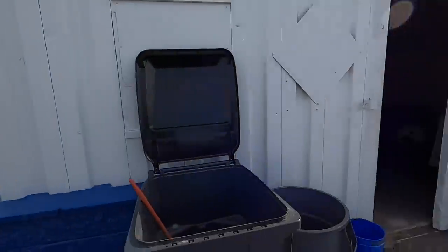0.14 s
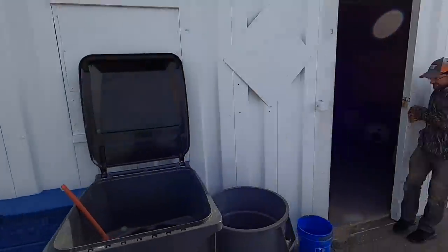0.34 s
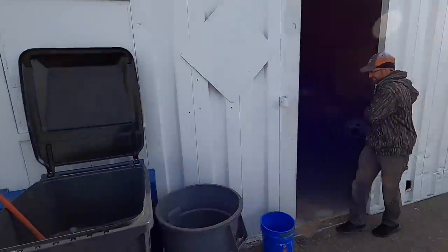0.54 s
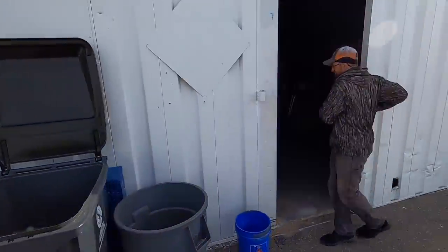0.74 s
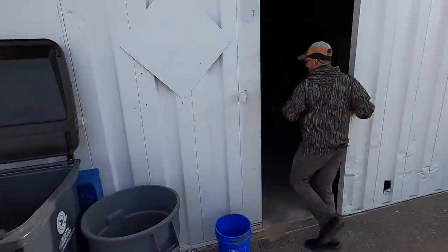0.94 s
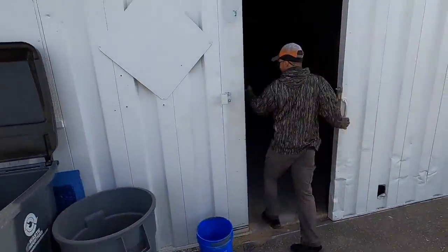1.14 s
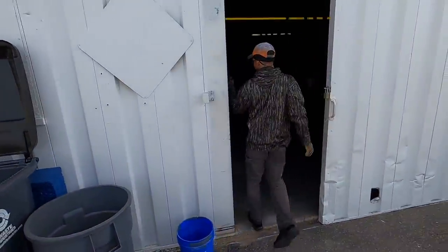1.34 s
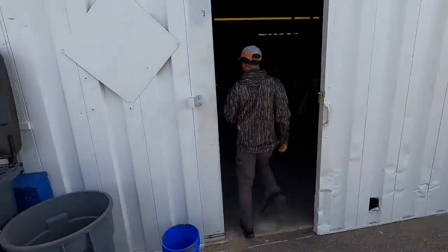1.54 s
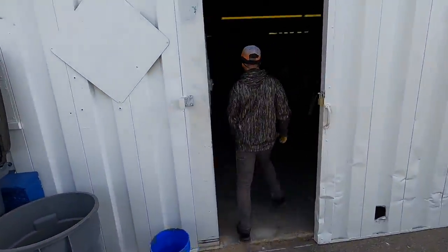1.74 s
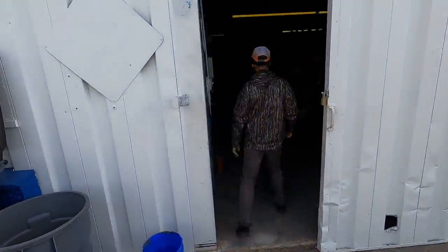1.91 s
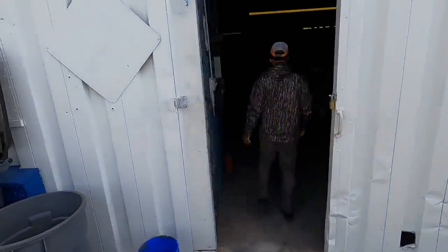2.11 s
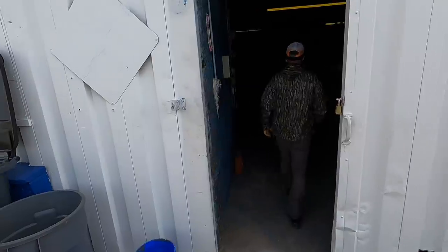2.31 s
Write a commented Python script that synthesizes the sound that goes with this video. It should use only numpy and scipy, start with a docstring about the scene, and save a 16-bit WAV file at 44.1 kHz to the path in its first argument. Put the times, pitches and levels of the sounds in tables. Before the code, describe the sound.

A big sheet-metal sliding door rumbles, booms and rattles at once, scraping in its track, then slows with small ticks and a hollow knock; soft gritty steps follow, heard close by outside a shed.

```python
"""A sheet-metal sliding door rumbles and booms along its track and coasts to rest; shoes then scuff grit.
Rumble, boom and track scrape are coloured noise riding level curves; jolts, stop knocks, ticks and scuffs
are bursts of tiny impacts with a favoured pitch. Squeaks, groans, the ringing door edge and low thuds
are sines. A faint noise wash of air comes up late, as the steps enter the shed."""
import sys
import numpy as np
from scipy import signal
from scipy.fft import rfft, irfft, next_fast_len
from scipy.io import wavfile
from scipy.ndimage import uniform_filter1d, map_coordinates

SR = 44100
rng = np.random.default_rng(int(sys.argv[2]) if len(sys.argv) > 2 else 0)


def output_pcm(signal):
    """Save a mono or channel-first signal as 16-bit PCM at the path in sys.argv[1].

    Samples are clipped to [-1, 1] before scaling.
    """
    pcm = np.clip(np.atleast_2d(signal).T, -1, 1) * 32767
    wavfile.write(sys.argv[1], SR, np.round(pcm).astype(np.int16))


def boost(x):
    """Linear amplitude factor 10**(x/20) for a level x in decibels (scalar or array-like)."""
    u = np.asarray(x, float) / 20
    return 10 ** u


N = 108618  # length in samples

# Scrape in the track. Each row: time in seconds, level in dB.
DRAG_LEVEL = [(0, -34.5), (.5, -33), (.76, -35.5), (.95, -44), (1.08, -42.5), (1.25, -46), (1.75, -58.5)]
# The door knocks on its stop and settles. Each row: time in seconds, level in dB, ring in Hz, t60 in seconds.
STOP_KNOCKS = [(1.186, -30.5, 950, 0.32), (1.287, -39, 694, 0.17)]
# Colour of grit and loose fittings. Each row: frequency in Hz, relative level in dB.
GRIT_COLOUR = [(290, -50), (500, -4), (1410, -5), (3790, -11.5), (8980, -26.5), (15500, -53)]


def unit(x):
    """Scale to rms 1."""
    return x / np.sqrt(np.mean(x ** 2) + 1e-20)


def along(points, hz):
    """Read (Hz, value) points on a log frequency axis."""
    f, v = np.transpose(points)
    return np.interp(np.log(hz + 1), np.log(f + 1), v)


def curve(rows):
    """Join (seconds, value) points by lines, one value per sample."""
    return np.interp(np.arange(N) / SR, *np.transpose(rows))


def wobble(rate):
    """A smooth random curve with rate knots a second."""
    knots = rng.standard_normal(int(N * rate / SR) + 4)
    return map_coordinates(knots, [np.arange(N) * rate / SR])


def filtered(x, gain_db):
    """Colour x by a dB function of frequency."""
    m = next_fast_len(len(x) + 4096)
    gain = boost(gain_db(np.fft.rfftfreq(m, 1 / SR)))
    return irfft(rfft(x, m) * gain, m)[:len(x)]


def grains(size, spread_db):
    """Dense tiny impacts: noise whose strength changes at random every 16 samples."""
    strength_db = spread_db * np.repeat(rng.standard_normal(size // 16 + 1), 16)[:size]
    return unit(rng.standard_normal(size) * boost(strength_db))


def place(out, seconds, sound):
    """Mix a sound into out from a given time."""
    out[round(seconds * SR):][:len(sound)] += sound


def bursts(rows, spectrum, rise_s, spread_db, ring_db, snap=0):
    """Each row is a swell of impacts with one favoured pitch; snap adds one strong, blunt first impact."""
    ring_sharpness = 4
    snap_reach = 1.9  # sets how far up the first impact carries, as a multiple of the favoured pitch
    treble_hz, treble_db = 6000, 2.5  # without a snap, the treble starts brighter and dies twice as fast
    out, size, lead = np.zeros(N + SR), SR // 3, SR // 20
    t = (np.arange(size) - lead) / SR  # zero where the rise ends and the decay begins
    for s, db, hz, t60 in rows:
        rise = np.exp(-.5 * (t / rise_s) ** 2)
        shape = np.where(t < 0, rise, boost(-60 * t / max(t60, .01)))

        def colour(f):
            ring = ring_db / (1 + (ring_sharpness * np.log((f + 1) / hz)) ** 2)
            return along(spectrum, f) + ring

        blow = np.exp(-(np.pi * snap_reach * hz * t) ** 2)
        impacts = grains(size, spread_db) + snap * blow / blow.sum()
        swell = unit(filtered(impacts, colour))
        if not snap:
            treble = filtered(swell, lambda f: -10 * np.log10(1 + (treble_hz / (f + 1)) ** 4))
            swell = swell - treble + treble * shape * boost(treble_db)
        place(out, s, boost(db) * shape * swell)
    return out[lead:lead + N]


def modes_db(hz):
    """The sheet resonates: each mode lifts a band around its pitch."""
    # Each row: frequency in Hz, width in Hz, lift in dB.
    panel_modes = [(236.5, 4.1, 7), (349.5, 90, 3), (1000, 165, 5), (1234, 17, 2.5)]
    return sum(lift / (1 + (2 * (hz - c) / w) ** 2) for c, w, lift in panel_modes)


def rolling_rumble():
    """The rolling panel rumbles with its modes; its upper part dulls as the track drag falls."""
    # Each row: time in seconds, level in dB before dulling and wobble.
    roll_level = [(0, -25.5), (.15, -18.5), (.33, -19), (.44, -16), (.6, -21), (.8, -23), (.92, -25),
                  (1.0, -30), (1.46, -34.5), (1.82, -44), (2.46, -43.5)]
    # Each row: frequency in Hz, relative level in dB.
    panel_colour = [(59, -6), (100, -3.5), (145, -0.5), (250, -0.5), (350, -6.5), (600, -18.5),
                    (910, -20.5), (1540, -120)]
    dulling_hz, dulling_db = 306, 0.52  # above this pitch, dB lost for each dB the drag falls
    body = unit(filtered(grains(N, spread_db=1.5), lambda f: along(panel_colour, f) + modes_db(f)))
    low = filtered(body, lambda f: -10 * np.log10(1 + (f / dulling_hz) ** 8))
    drag_db = curve(DRAG_LEVEL)
    body = low + (body - low) * boost(dulling_db * (drag_db - drag_db.max()))
    return body * boost(curve(roll_level) + 1.7 * wobble(24.77))


def flexing_boom():
    """The flexing sheet booms: low noise swelling and falling."""
    # Each row: time in seconds, level in dB.
    flex_level = [(.05, -26), (.16, -15.5), (.25, -24.5), (.31, -18), (.4, -32.5), (.48, -15), (.54, -42),
                  (.59, -25), (.99, -29), (1.12, -22), (1.18, -27), (1.44, -27), (1.52, -32.5), (1.93, -37),
                  (2.15, -37.5), (2.33, -37), (2.39, -35.5)]
    # Each row: frequency in Hz, relative level in dB.
    boom_colour = [(11, -50), (22, -9), (50, 5), (72, -2), (150, -7.5), (330, -120)]
    boom = unit(filtered(rng.standard_normal(N), lambda f: along(boom_colour, f)))
    return boom * boost(curve(flex_level))


def track_drag():
    """Grit scrapes in the track: uneven grains heard through the panel's modes."""
    # Each row: frequency in Hz, relative level in dB.
    track_colour = [(260, -38), (450, 1), (700, 0), (1300, -2.5), (3910, -16), (8570, -33), (15500, -61)]
    scrape = unit(filtered(grains(N, spread_db=3.5), lambda f: along(track_colour, f) + modes_db(f)))
    return scrape * boost(curve(DRAG_LEVEL) + 0.66 * wobble(29.25))


def roller_jolts():
    """The rollers jolt over bumps and rattle the sheet."""
    # Each row: time in seconds, level in dB, strongest ring in Hz, t60 in seconds.
    jolt_rows = [(.022, -31, 1330, 0.27), (.088, -35, 3800, 0.14), (.178, -30, 4230, 0.4),
                 (.26, -24, 4360, 0.32), (.372, -27.5, 1250, 0.29), (.42, -29.5, 1000, 0.91),
                 (.472, -28, 1000, 0.14), (.575, -32, 1250, 0.82), (.63, -36.5, 4080, 0.26),
                 (.665, -31.5, 1700, 0.15), (.74, -39.5, 3130, 0.34), (.805, -37, 6300, 0.14),
                 (.868, -51, 5030, 0.24), (1.355, -44, 3200, 0.66)]
    # Each row: frequency in Hz, relative level in dB.
    rattle_colour = [(290, -58), (500, -33), (657, -1), (1130, 5), (3530, -8), (4600, -13.5),
                     (11100, -31.5), (15500, -59)]
    return bursts(jolt_rows, rattle_colour, rise_s=0.013, spread_db=1.0, ring_db=4.5)


def stop_knocks():
    """The door knocks on its stop: hollow bursts with a strong favoured pitch."""
    # Each row: frequency in Hz, relative level in dB.
    hollow_colour = [(250, -33), (500, 3), (1000, 1.5), (2000, 1), (9000, -44)]
    return bursts(STOP_KNOCKS, hollow_colour, rise_s=0.0027, spread_db=7.5, ring_db=15.0)


def loose_ticks():
    """Loose fittings tick sharply as the door slows."""
    # Each row: time in seconds, level in dB, strongest ring in Hz, t60 in seconds.
    tick_rows = [(.988, -43, 2500, 0.22), (1.024, -40, 2220, 0.3), (1.065, -43.5, 4900, 0.11),
                 (1.084, -40, 3970, 0.087), (1.107, -39, 3450, .12), (1.152, -45, 6000, 0.11)]
    return bursts(tick_rows, GRIT_COLOUR, rise_s=0.0018, spread_db=3.5, ring_db=4.5, snap=7)


def bending(x, depth_db):
    """The sheet bends as it moves: narrow resonances come up and fade."""
    z = signal.stft(x, nperseg=1024)[2]
    field = uniform_filter1d(rng.standard_normal(z.shape), size=2, axis=0)  # across pitch
    field = uniform_filter1d(field, size=6, axis=1)  # across time
    power_offset_db = depth_db ** 2 * np.log(10) / 20  # keeps the mean power
    z = z * boost(depth_db * unit(field) - power_offset_db)
    return signal.istft(z, nperseg=1024)[1][:N]


def door():
    """Rumble, drag, jolts and knocks pass through the bending sheet; boom and ticks join unbent."""
    sheet = rolling_rumble() + track_drag() + roller_jolts() + stop_knocks()
    return flexing_boom() + loose_ticks() + bending(sheet, depth_db=1.5)


def roller_squeaks():
    """The rollers squeak: very short sine tones that swell and fade."""
    # Each row: middle in seconds, peak level in dB, pitch in Hz.
    squeak_rows = [(0.027, -26.5, 1315), (0.181, -33, 4030), (0.264, -38, 4800), (0.54, -42.5, 5620)]
    width_s = 0.0045
    out, u = np.zeros(N + SR), np.arange(SR // 2) / SR - 2 * width_s
    for s, db, hz in squeak_rows:
        tone = np.sin(2 * np.pi * hz * (u + 2 * width_s))
        place(out, s - 2 * width_s, boost(db) * np.exp(-(u / width_s) ** 2) * tone)
    return out[:N]


def edge_groans():
    """The settling edge groans: rough tones gliding upward."""
    # Each row: middle in seconds, peak level in dB, pitch at the middle in Hz, rise in Hz per second.
    groan_rows = [(1.33, -40.5, 985, 2450), (1.424, -44.5, 954, 5300)]
    width_s = 0.034
    out, u = np.zeros(N + SR), np.arange(SR // 2) / SR - 2 * width_s
    for s, db, hz, rise in groan_rows:
        roughness = np.cumsum(rng.normal(0, 0.079, len(u)))  # random drift of phase
        phase = 2 * np.pi * (hz + rise * u / 2) * u + roughness
        place(out, s - 2 * width_s, boost(db) * np.exp(-(u / width_s) ** 2) * np.sin(phase))
    return out[:N]


def edge_ring():
    """Every stop knock rings the door edge: decaying modes with slightly rough pitch."""
    # Each row: pitch in Hz, relative level in dB, t60 in seconds.
    edge_modes = [(820, -2.5, 0.39), (950, 1.5, 0.16), (1518, -2, 0.11)]
    out, t = np.zeros(N + SR), np.arange(SR // 2) / SR
    onset = 1 - np.exp(-t / 0.004)
    for s, db, _, _ in STOP_KNOCKS:
        for hz, level, t60 in edge_modes:
            phase = 2 * np.pi * hz * t + np.cumsum(rng.normal(0, 0.039, len(t)))
            decay = boost(db - 0.5 + level - 60 * t / t60)
            place(out, s, decay * onset * np.sin(phase))
    return out[:N]


def shoe_scuffs():
    """Grit clicks and crunches under the soles: a blunt first impact, then fine grains."""
    # Each row: time in seconds, level in dB, strongest pitch in Hz, t60 in seconds.
    scuff_rows = [(1.289, -42.5, 5360, 0.08), (1.538, -45, 3080, 0.037), (1.546, -50, 3180, 0.12),
                  (1.609, -51, 2640, 0.17), (1.641, -51.5, 2500, 0.19), (1.684, -48, 1910, 0.083),
                  (1.695, -45.5, 1190, 0.057), (1.935, -46, 2220, 0.3), (1.948, -48.5, 3520, 0.28),
                  (1.966, -43, 2280, 0.21), (1.982, -45.5, 1200, 0.23), (2.038, -49, 3100, 0.15),
                  (2.082, -45, 4240, 0.0073), (2.087, -42, 3830, 0.019), (2.1, -46.5, 2720, 0.29),
                  (2.202, -52.5, 2000, 0.28), (2.237, -48, 2720, 0.011), (2.302, -50.5, 1530, 0.087),
                  (2.418, -56, 11150, 0.16), (2.436, -45, 1320, 0.17)]
    return bursts(scuff_rows, GRIT_COLOUR, rise_s=0.0018, spread_db=0.5, ring_db=11.5, snap=14)


def low_thuds():
    """Low thuds, sines that die at once: the first from the door, the later ones from heels."""
    # Each row: start in seconds, starting level in dB, pitch in Hz.
    thud_rows = [(1.285, -19.5, 278), (1.937, -25.5, 236), (1.956, -22.5, 277), (1.971, -27, 243)]
    t60_s = 0.039
    out, t = np.zeros(N + SR), np.arange(SR // 8) / SR
    for s, db, hz in thud_rows:
        place(out, s, boost(db - 60 * t / t60_s) * np.sin(2 * np.pi * hz * t))
    return out[:N]


def air():
    """A faint noise wash of air comes up late, as the steps enter the shed."""
    # Each row: frequency in Hz, relative level in dB.
    air_colour = [(180, -41), (300, -1), (600, -15.5), (4420, -27.5), (9140, -40.5), (15500, -60)]
    # Each row: time in seconds, level in dB.
    air_level = [(1.85, -56.5), (2.0, -52)]
    wash = unit(filtered(rng.standard_normal(N), lambda f: along(air_colour, f)))
    return boost(curve(air_level)) * wash


def scene():
    """Mix door, tones, scuffs, thuds and air into one sound for both channels."""
    tones = roller_squeaks() + edge_groans() + edge_ring()
    impacts = shoe_scuffs() + low_thuds()
    return np.tile(door() + tones + impacts + air(), (2, 1))


def low_pass(x):
    """Removes everything above the highest recorded frequency."""
    return signal.sosfilt(signal.butter(12, 15710, fs=SR, output="sos"), x)


def record(dry):
    """The top treble drifts apart between the channels, the right one stronger."""
    apart_hz, apart_db, lean = 11500, -0.5, 0.3
    top = filtered(dry[0], lambda f: np.where(f > apart_hz, 0, -120))
    side = top * (boost(apart_db) * wobble(400) - lean)
    return low_pass(dry + [side, -side])


dry = scene()
out = record(dry)
output_pcm(out)
```